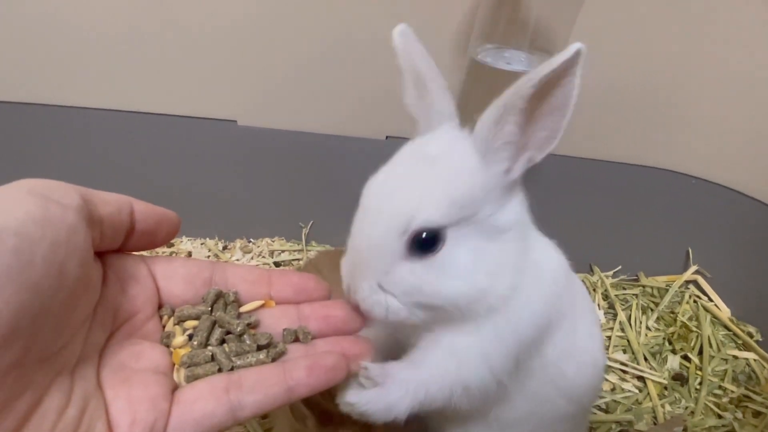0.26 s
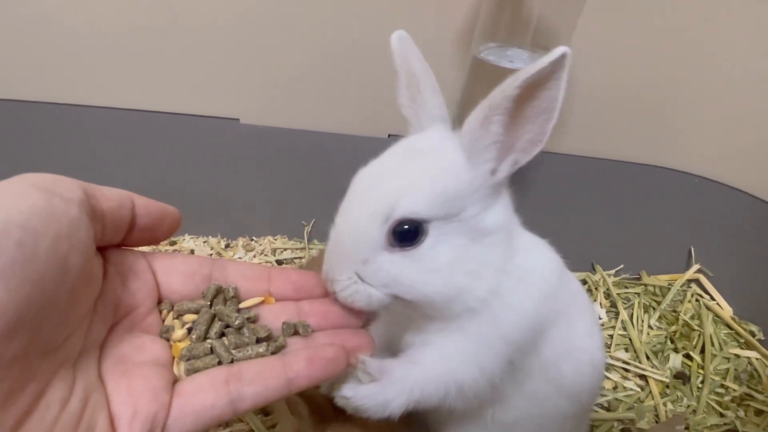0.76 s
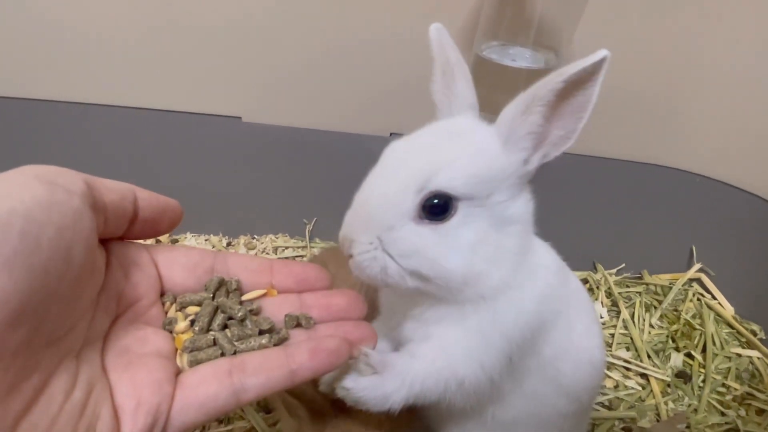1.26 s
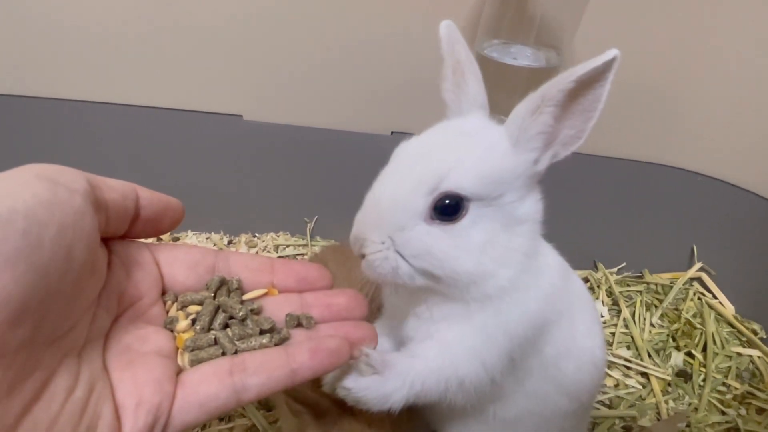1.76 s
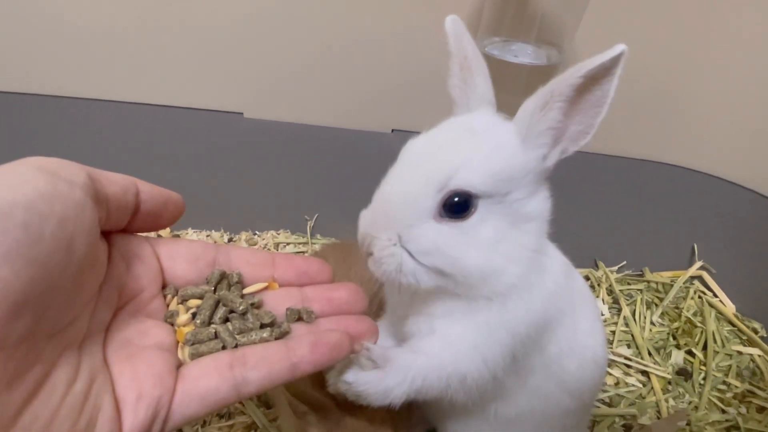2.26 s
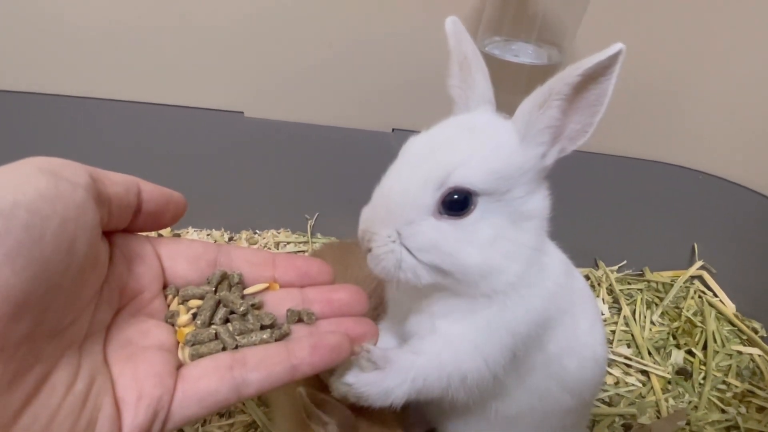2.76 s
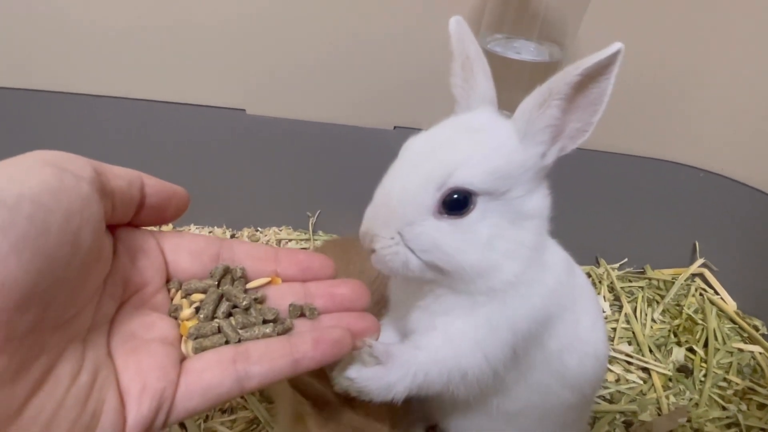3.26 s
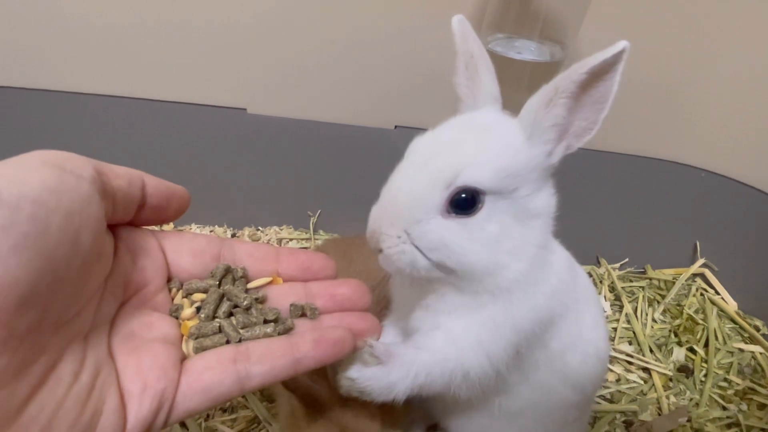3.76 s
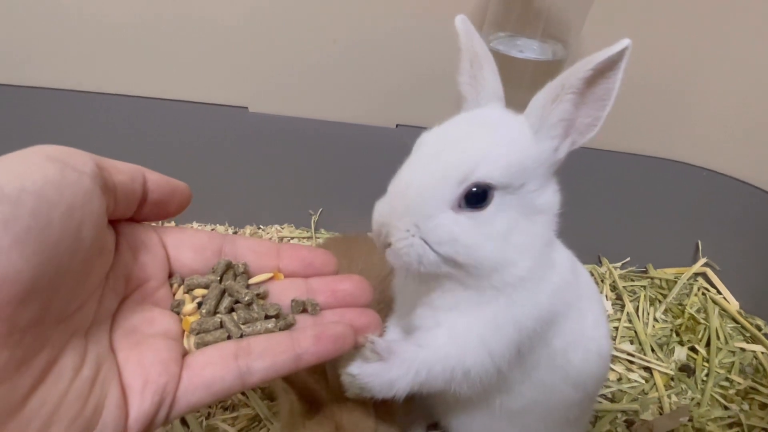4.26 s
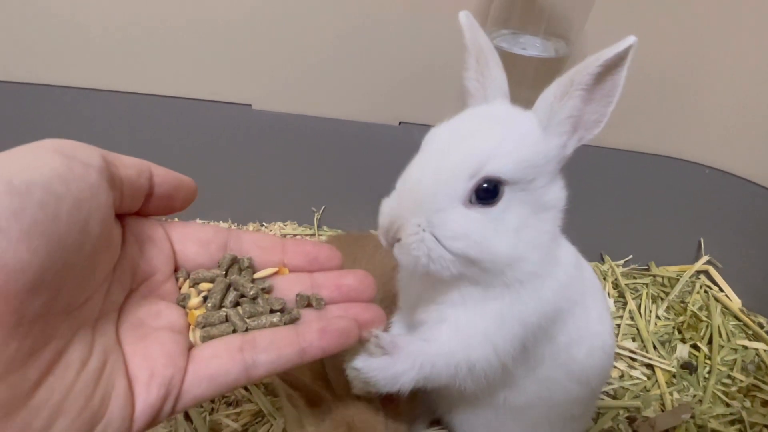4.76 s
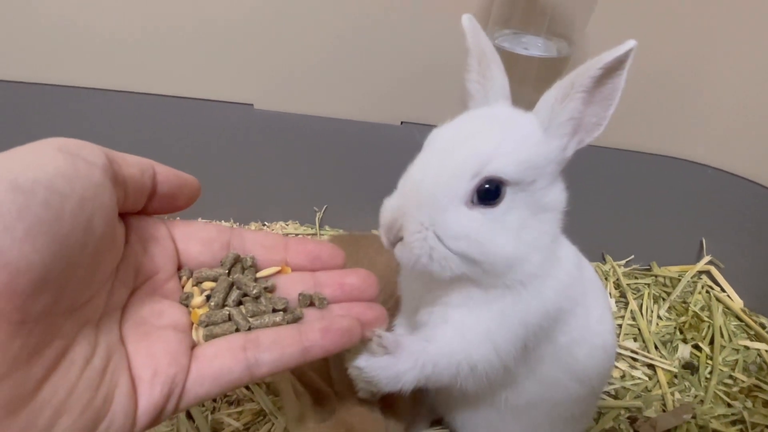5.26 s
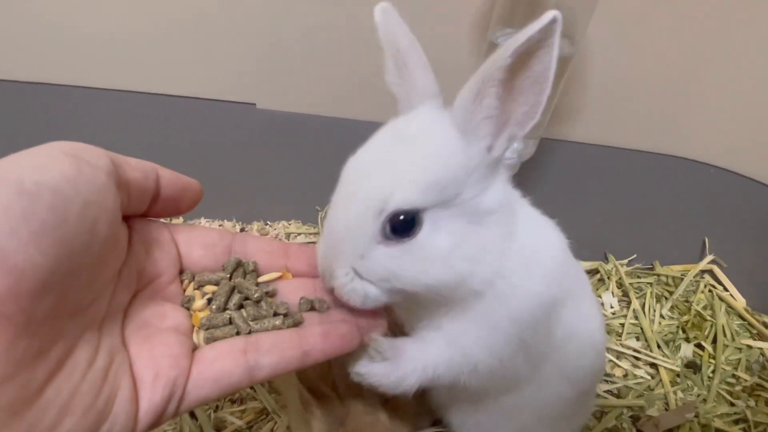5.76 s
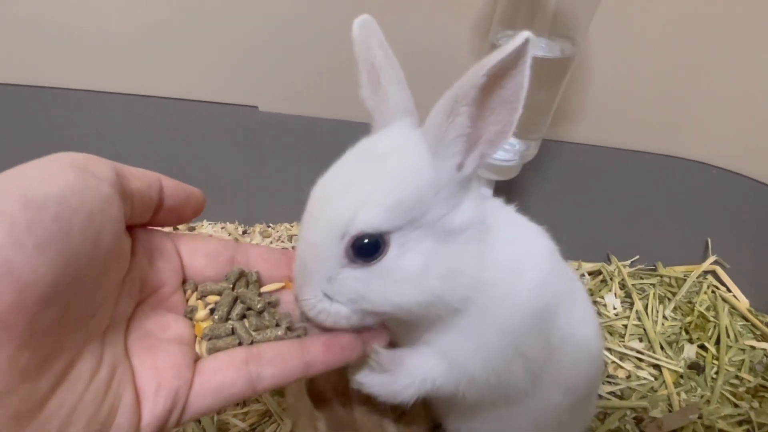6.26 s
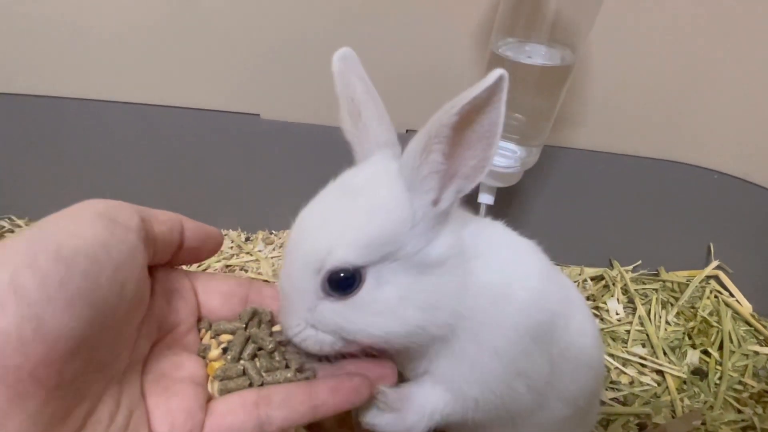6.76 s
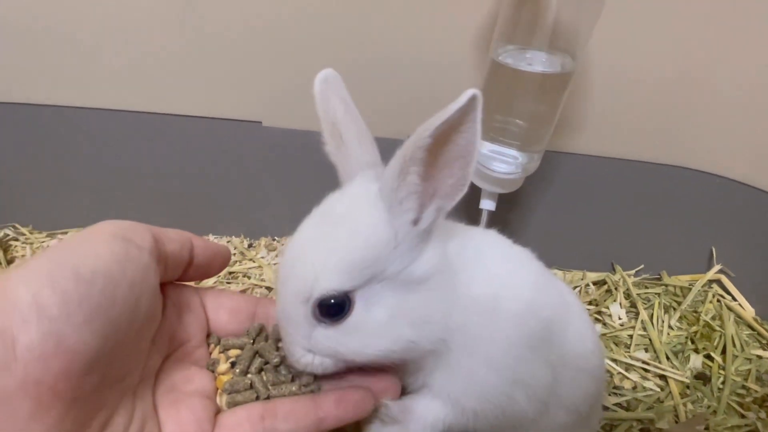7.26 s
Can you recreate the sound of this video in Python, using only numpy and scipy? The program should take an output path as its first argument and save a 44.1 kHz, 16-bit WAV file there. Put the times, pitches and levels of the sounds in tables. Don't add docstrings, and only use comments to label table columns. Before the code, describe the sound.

Steady low hum, ventilation rumble and thin hiss fill a small quiet room. Close up, faint nose air and one or two soft bites come first; after about two seconds, dry brittle crunches follow at irregular gaps, strongest in the middle. Then the muzzle settles on the palm, bringing airy fur friction, breathy puffs, quick light nibbles and crisp tiny ticks. Almost no echo; harder bites lean left.

```python
import sys
import numpy as np
from scipy import signal
from scipy.fft import rfft, irfft
from scipy.io import wavfile
from scipy.ndimage import uniform_filter1d

SR = 44100
rng = np.random.default_rng(int(sys.argv[2]) if len(sys.argv) > 2 else 0)


def pcm_store(signal):
    levels = np.round(np.clip(np.atleast_2d(signal), -1, 1) * 32767)
    wavfile.write(sys.argv[1], SR, levels.astype(np.int16).T)


def ratio_of_db(decibels):
    return 10 ** (np.asarray(decibels, float) / 20)


N = 330750
HZ = np.fft.rfftfreq(N, 1 / SR)

# start_s, peak_db, jaw_thud_db, upper_jaw_ring_db, splinter_db (the last three re peak)
BITES = [(0.359, -71, 10, -5.5, -11), (0.512, -51.5, -12, -29, -25), (1.31, -59.5, 3.5, 4.5, -9),
         (1.994, -69.5, -17, -1.5, 0.5), (2.438, -37, -24, -20, -27.5), (2.696, -49.5, -24, -26, -39),
         (2.916, -46.5, -24, -24, -31), (3.104, -35.5, -27, -12.5, -20), (3.328, -40, -21, -16, -52),
         (3.595, -39.5, -17, -14, -14.5), (3.817, -49, -34, -19, -21), (4.065, -50.5, -5, -9.5, -17),
         (4.502, -54, -20, -10, -17), (4.701, -32, -22, -8, -19), (4.743, -41.5, -9.5, -11, -27),
         (5.038, -44.5, -2, -15, -6.5), (5.439, -57, 3, -9.5, 0.5), (5.802, -58, -16, -9, -11),
         (5.999, -44, -8.5, -23.5, -21), (6.258, -51.5, -3.5, -21, -19.5), (6.332, -61, -1, -27, -7),
         (6.885, -44.5, -3.5, -11.5, -22), (7.092, -50.5, -12, -11, -23)]
# start_s, peak_db
NIBBLES = [(1.512, -69), (2.171, -60), (2.495, -62), (3.032, -60), (3.384, -59), (4.079, -50),
           (4.227, -57.5), (4.267, -59), (5.698, -56.5), (5.97, -60), (6.088, -63), (6.144, -65),
           (6.198, -56), (6.224, -57), (6.46, -55), (6.552, -72), (6.836, -50), (7.109, -53.5)]
# jaw_thud_db, upper_jaw_ring_db, splinter_db
NIBBLE_COLOUR = (-22.5, -18, -19.5)
# pitch_hz, t60_s, left_db, right_db
JAW_MODES = [(663, 0.011, 1.5, -20), (1170, 0.021, -14.5, -60), (1797, 0.011, -10.5, 3.5),
             (2230, 0.0098, -7, -36)]
# pitch_hz, width_hz, level_db
SPLINTER_MODES = [(3050, 1400, 1.5), (4220, 380, -5), (4750, 1740, 0.5), (6940, 440, -10.5)]
# start_s, peak_db, centre_hz
TOOTH_CLICKS = [(1.3114, -58.5, 12900), (1.9949, -55, 11900), (2.4394, -67, 13400), (2.916, -63, 12200),
                (3.029, -62, 12600), (3.1043, -66, 12800), (3.3285, -63.5, 13400), (3.5948, -52, 12300),
                (4.702, -61, 12900), (5.039, -35, 12200), (5.4385, -40.5, 12300), (5.8032, -59, 12800),
                (6, -58, 12800), (6.3325, -68, 11900), (7.1057, -63, 11700)]
# start_s, peak_db, centre_hz
WHISKER_TICKS = [(0.0418, -61, 13100), (0.4579, -62, 12800), (0.5038, -64, 12000), (0.7607, -62.5, 12900),
                 (0.8629, -67, 12300), (1.0331, -53, 12800), (1.059, -62, 12800), (1.6242, -63, 12700),
                 (2.6618, -57, 11900), (2.9392, -61, 13300), (4.1255, -63, 12800), (4.2994, -75, 12300),
                 (4.369, -65, 14400), (4.5206, -61, 14300), (4.8035, -61, 14400), (5.5508, -69, 12400),
                 (5.575, -61, 12300), (5.8965, -55, 13600), (5.9223, -46, 10600), (5.9678, -60, 12700),
                 (6.0631, -53, 13200), (6.3618, -55.5, 11500), (6.5425, -57, 11700), (6.562, -47.5, 12300),
                 (6.6822, -59, 12900), (6.8568, -61, 12100), (6.9042, -51.5, 12100)]
# start_s, hold_s, rustle_db
BRUSH_STROKES = [(0.304, 0.082, -80), (1.53, 0.15, -78.5), (3.55, 0.12, -81), (4.05, 0.1, -82),
                 (5.05, 0.05, -82), (5.56, 0.03, -73), (5.69, 0.13, -72), (5.914, 0.02, -64),
                 (5.994, 0.01, -72), (6.063, 0.024, -69), (6.287, 0.061, -69), (6.52, 0.057, -63.5),
                 (6.692, 0.017, -72), (6.873, 0.026, -71), (7.248, 0.16, -78)]
# frequency_hz, level_db
FUR_SPECTRUM = [(5000, -52), (7000, -42), (9000, -2), (10800, -11), (12000, -1), (13200, -2), (14200, -14),
                (15600, -9), (16200, -30)]
# start_s, hold_s, puff_db, low_buffet_db
NOSE_AIR = [
    [(0.0, 0.073, -73, -76), (0.19, 0.067, -72.5, -69), (0.29, 0.094, -69.5, -75), (0.49, 0.02, -83, -60)],
    [(5.62, 0.03, -77, -61), (5.88, 0.061, -75, -56), (6.0, 0.5, -82, -61.5), (6.52, 0.06, -72, -70),
     (6.6, 0.078, -55.5, -49.5), (6.74, 0.11, -67.5, -58), (6.87, 0.16, -66, -54.5),
     (7.1, 0.015, -68.5, -53.5), (7.29, 0.016, -73, -58.5), (7.43, 0.03, -72, -56)],
]
# frequency_hz, level_db
NOSE_SPECTRA = [
    [(400, -10), (1000, -4), (1600, -10), (2000, 0), (2400, -7), (2800, -20), (6000, -32)],
    [(200, -6), (700, 0), (1400, 0), (2100, -2), (2500, -5), (3050, -1), (3250, -13), (4000, -12),
     (5400, -20), (6600, -16), (8000, -30)],
]
# pitch_hz, rms_db, left_minus_right_db
HUM_TONES = [(119.87, -53.5, 4.5), (293, -85.5, -11)]
# frequency_hz, level_db
DUCT_SPECTRUM = [(20, -27.5), (40, -13), (50, -3.5), (56, 10.5), (60, 6), (65, 9), (72, 3.5), (100, -1),
                 (150, -7.5), (200, -21.5), (290, -21), (400, -55)]
# start_s, hold_s, level_db
DUCT_GUSTS = [
    (0.553, 0.026, -48.5),
    (4.99, 0.055, -51.5),
    (6.664, 0.022, -52.5),
    (6.916, 0.05, -49),
]
# frequency_hz, left_db_per_hz, left_minus_right_db, likeness (0-1)
ROOM_HISS = [(194, -91.5, 4.5, 0.32), (467, -99, 2.5, 0.03), (1100, -102, 1, 0), (2300, -113, 1.5, 0.23),
             (5470, -114, 5.5, 0), (6000, -114, 4, 0.4), (8060, -117, 4.5, 0.06), (10200, -123, 4, 1),
             (12300, -121, 2.5, 0.67), (13600, -128, -4, 1), (16100, -135, -16, .99)]
# frequency_hz, phase_rad
PORT_PHASE = [(0, 0), (300, -.1), (4000, -3.1), (5500, -3.8), (7200, -6), (7700, -3.2), (9000, -3),
              (13500, 0), (22050, 0)]
# centre_hz, width_hz, depth_db
CAVITY_DIPS = [(5594, 134, -11), (7480, 310, -6)]
# low_hz, high_hz, opening_db
TOP_GATES = [(13350, 13800, -96.5), (13800, 14300, -89), (14300, 15000, -90), (15000, 15800, -90),
             (15800, 22050, -72)]
# low_hz, high_hz
CANCELLED_BANDS = [(8800, 9400), (9400, 10100), (10100, 10800)]


def bites():
    rows = BITES + [row + NIBBLE_COLOUR for row in NIBBLES]
    start_s, peak_db, thud_db, upper_db, splinter_db = np.transpose(rows)
    start_s = start_s + 0.001236
    jaw = jaw_snaps(start_s, peak_db, thud_db, upper_db) + grinding(start_s, peak_db)
    jaw = band_pass(jaw, 3, 450, 2500)
    return jaw + splinters(start_s, peak_db, splinter_db)


def jaw_snaps(start_s, peak_db, thud_db, upper_db):
    at = np.round(start_s * SR).astype(int)
    pan_db = 3.5 + 0.92 * (peak_db + 50)
    snap = np.zeros(N)
    snap[at] = -ratio_of_db(peak_db + 11.5)
    jaw = np.zeros((2, N + 2048))
    jaw[0, :N] += 0.24 * ring(ring(snap, 1620, 1260), 1300, 1090)
    jaw[0, :N] += 0.18 * ring(snap, 1090, 210)
    detune = 1 + 0.014 * rng.standard_normal((len(at), len(JAW_MODES)))
    breaking = rng.standard_normal((len(at), len(JAW_MODES), 2, 2048))
    breaking = breaking * ratio_of_db(-21 - 60 * np.arange(2048) / SR / 0.027)
    shares_db = np.transpose([thud_db + 10.5, 0 * start_s, upper_db + 13.5, upper_db + 4.5])
    for k, start in enumerate(at):
        modes = zip(JAW_MODES, shares_db[k], detune[k], breaking[k])
        for (pitch_hz, t60_s, left_db, right_db), share_db, tune, push in modes:
            first = np.zeros((2, 2048))
            first[[0, 1], [2, 37]] = ratio_of_db([left_db + pan_db[k] / 2, right_db - pan_db[k] / 2])
            width_hz = np.log(1000) / np.pi / t60_s
            tone = ring(first + push, pitch_hz * tune, width_hz)
            jaw[:, start:start + 2048] += ratio_of_db(peak_db[k] + share_db) * tone
    return jaw[:, :N]


def grinding(start_s, peak_db):
    crumbs = np.array([bursts(start_s + 0.0054, peak_db - 36.0, 0.25, spiky_db=9.0) for port in "LR"])
    crumbs += [bursts(N / SR - start_s, peak_db - 28, 0.02, spiky_db=7.0)[::-1] for port in "LR"]
    return ring(crumbs, 1200, 600) + 0.3 * ring(crumbs, 1160, 120) + 0.25 * ring(crumbs, 2100, 1300)


def splinters(start_s, peak_db, splinter_db):
    level_db, spiky_db = peak_db + splinter_db, 4.0
    crack = np.array([bursts(start_s, level_db + 4.5, 0.012, spiky_db) for port in "LR"])
    crack += [bursts(start_s + 0.0047, level_db - 12.0, 0.076, spiky_db) for port in "LR"]
    tones = [ratio_of_db(db) * ring(crack, pitch_hz, width_hz) * (-1) ** k
             for k, (pitch_hz, width_hz, db) in enumerate(SPLINTER_MODES)]
    return pair(*sum(tones), 0.35)


def ticks():
    rows = list(TOOTH_CLICKS) + list(WHISKER_TICKS)
    out, age = np.zeros((2, N + 4096)), np.arange(4096) / SR
    shape = (len(rows), 2, 4096)
    grains = rng.standard_normal(shape) * ratio_of_db(3.0 * rng.standard_normal(shape))
    for (start_s, peak_db, centre_hz), grain in zip(rows, grains):
        t60_s = max(0.04 - 0.1 * (peak_db + 70), 0.008)
        fluff = ratio_of_db(-21 - 60 * age / 0.16) * (peak_db < -50)
        grain = grain * (ratio_of_db(-60 * age / t60_s) + fluff)
        grain = ring(ring(grain, centre_hz, 3700), centre_hz, 3700) + 0.37 * ring(grain, 8400, 1000)
        grain = grain / np.abs(grain).max(axis=1, keepdims=True)
        out[:, round(start_s * SR):][:, :4096] += ratio_of_db(peak_db + 1.5) * grain
    tick = band_pass(out[:, :N], 3, 6500, 14900)
    return pair(*tick, np.where(HZ < 10500, 0.4, 0.95))


def brushing():
    grains = rng.standard_normal((2, N)) * ratio_of_db(7.1 * rng.standard_normal((2, N)) + 2.0 * drift(40))
    spectrum = rfft(pair(*coloured(grains, at_hz(FUR_SPECTRUM)[0]), 0.84))
    edges_hz = [0, 11300, 12600, 14000, SR / 2]
    hairs = 0
    for low_hz, high_hz in zip(edges_hz, edges_hz[1:]):
        hairs = hairs + ratio_of_db(2.9 * drift(19)) * cut_band(spectrum, low_hz, high_hz)
    lean_in_s, rest_db, lean_db = 5.47, -96, -78.5
    touch = ratio_of_db(np.where(np.arange(N) < lean_in_s * SR, rest_db, lean_db))
    stroke = strokes(*np.transpose(BRUSH_STROKES), rise_db_per_s=140, fall_db_per_s=120)
    return ratio_of_db(-6.0) * np.hypot(touch, stroke) * hairs


def sniffing():
    out = 0
    for rows, spectrum in zip(NOSE_AIR, NOSE_SPECTRA):
        start_s, hold_s, *levels_db = np.transpose(rows)
        puff, buffet = (strokes(start_s, hold_s, db, rise_db_per_s=242, fall_db_per_s=226)
                        for db in levels_db)
        flutter_db = 1.2 * drift(40)
        air = coloured(rng.standard_normal((2, N)), at_hz(spectrum)[0])
        low = band_pass(rng.standard_normal((2, N)), 2, 110, 300)
        out = out + puff * ratio_of_db(flutter_db - 2.0) * pair(*air, 0.17)
        out = out + buffet * ratio_of_db(-3.5) * pair(*rms_one(low), 0.26)
    return out


def pen(x, t60_s=0.19, cut_hz=2600, hollow_hz=1170):
    age = np.arange(SR // 3) / SR
    noise = rng.standard_normal((2, 2, len(age))) * (1 - np.exp(-(age / 0.01) ** 2))
    dull = signal.butter(1, cut_hz, fs=SR, output="sos")
    tail = signal.sosfilt(dull, noise[0] * ratio_of_db(-60 * age / t60_s))
    tail += 0.04 * ring(noise[1] * ratio_of_db(-60 * age / 0.3), hollow_hz, 600)
    return signal.fftconvolve(x.mean(axis=0)[None], tail, axes=1)[:, :N]


def appliance_hum():
    t = np.arange(N) / SR
    hum = 0
    for pitch_hz, rms_db, pan_db in HUM_TONES:
        sides_db = np.array([[pan_db], [-pan_db]]) / 2
        level_db = rms_db + 0.51 * drift(0.45) + 1.62 * drift(16) + sides_db
        hum = hum + ratio_of_db(level_db) * np.sqrt(2) * np.sin(2 * np.pi * pitch_hz * t)
    return hum


def duct_rumble():
    left, other = coloured(rng.standard_normal((2, N)), at_hz(DUCT_SPECTRUM)[0])
    flow = ratio_of_db(-55 + 0.5042 * np.arange(N) / SR + 1.5 * drift(4.6))
    gusts = strokes(*np.transpose(DUCT_GUSTS), rise_db_per_s=70, fall_db_per_s=70)
    return np.hypot(flow, gusts) * ratio_of_db([[0.6], [-0.6]]) * pair(left, other, 0.88)


def room_hiss():
    level_db, balance_db, alike = at_hz(ROOM_HISS)
    white = pair(*rng.standard_normal((2, N)), alike) * np.sqrt(SR / 2)
    hiss = irfft(rfft(white) * ratio_of_db([level_db, level_db - balance_db]) * (HZ > 100), N)
    murmur = band_pass(hiss, 1, 500, 2300)
    return hiss + (ratio_of_db(1.84 * drift(8.5)) - 1) * murmur


def bursts(start_s, level_db, t60_s, spiky_db):
    out, age = np.zeros(N + 4096), np.arange(4096) / SR
    shape = (len(start_s), 4096)
    grains = rng.standard_normal(shape) * ratio_of_db(spiky_db * rng.standard_normal(shape))
    for s, db, grain in zip(start_s, level_db, grains):
        out[round(s * SR):][:4096] += ratio_of_db(db - 60 * age / t60_s) * grain / ratio_of_db(spiky_db)
    return out[:N]


def strokes(start_s, hold_s, level_db, rise_db_per_s, fall_db_per_s):
    t = np.arange(0, N + 64, 64)[:, None] / SR
    rise_db = rise_db_per_s * np.maximum(start_s - t, 0)
    fall_db = fall_db_per_s * np.maximum(t - start_s - hold_s, 0)
    gain = np.sqrt(np.sum(ratio_of_db(2 * (level_db - rise_db - fall_db)), axis=1))
    return np.interp(np.arange(N) / SR, t[:, 0], gain)


def ring(x, pitch_hz, width_hz):
    r, w = np.exp(-np.pi * width_hz / SR), 2 * np.pi * pitch_hz / SR
    return signal.lfilter([0, np.sin(w)], [1, -2 * r * np.cos(w), r * r], x + 1e-18)


def pair(x, other, alike):
    alike = np.clip(alike, 0, 1)
    shifted = rfft(x) * np.exp(1j * np.interp(HZ, *np.transpose(PORT_PHASE)))
    return np.array([x, irfft(alike * shifted + np.sqrt(1 - alike ** 2) * rfft(other), N)])


def drift(rate_hz):
    r = np.exp(-2 * np.pi * rate_hz / SR)
    return rms_one(signal.lfilter([1], [1, -2 * r, r * r], rng.standard_normal(N + SR))[SR:])


def coloured(x, db):
    return rms_one(irfft(rfft(x) * ratio_of_db(db), N))


def at_hz(rows):
    hz, *columns = np.transpose(rows)
    return [np.interp(np.log(HZ + 1), np.log(hz), column) for column in columns]


def band_pass(x, order, low_hz, high_hz):
    sos = signal.butter(order, [low_hz, high_hz], "band", fs=SR, output="sos")
    return signal.sosfilt(sos, x)


def cut_band(spectrum, low_hz, high_hz):
    return irfft(spectrum * (HZ >= low_hz) * (HZ < high_hz), N)


def rms_one(x):
    return x / np.sqrt(np.mean(x ** 2) + 1e-30)


def power(x):
    return uniform_filter1d(x ** 2, size=1024)


def scene():
    chewing = bites() + ticks()
    rabbit = chewing + ratio_of_db(-32.0) * pen(chewing) + brushing() + sniffing()
    return rabbit + appliance_hum() + duct_rumble() + room_hiss()


def low_pass(x):
    return signal.sosfilt(signal.butter(12, 16500, fs=SR, output="sos"), x)


def record(dry):
    dip_db = sum(db * np.exp(-((HZ - hz) / width_hz) ** 2) for hz, width_hz, db in CAVITY_DIPS)
    spectrum = rfft(dry) * ratio_of_db(dip_db)
    out = cut_band(spectrum, 0, TOP_GATES[0][0])
    for low_hz, high_hz, open_db in TOP_GATES:
        band = cut_band(spectrum, low_hz, high_hz)
        is_open = power(band.mean(axis=0)) > ratio_of_db(2 * open_db)
        out += band * uniform_filter1d(1.0 * is_open, size=300)
    for low_hz, high_hz in CANCELLED_BANDS:
        left, right = cut_band(spectrum, low_hz, high_hz) / 2
        lost = power(left + right) < ratio_of_db(-13) * power(left - right)
        out -= (left + right) * uniform_filter1d(1.0 * lost, size=300)
    return low_pass(out)


dry = scene()
out = record(dry)
pcm_store(out)
```